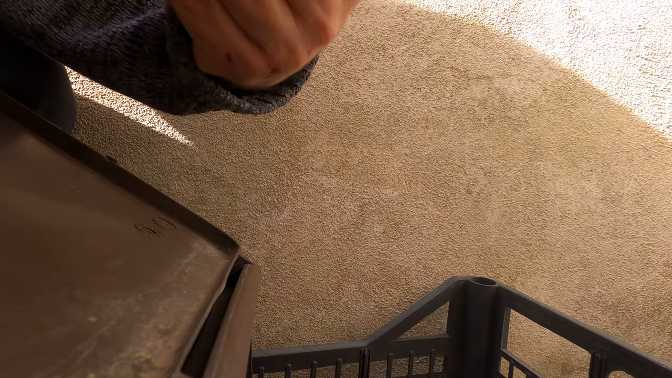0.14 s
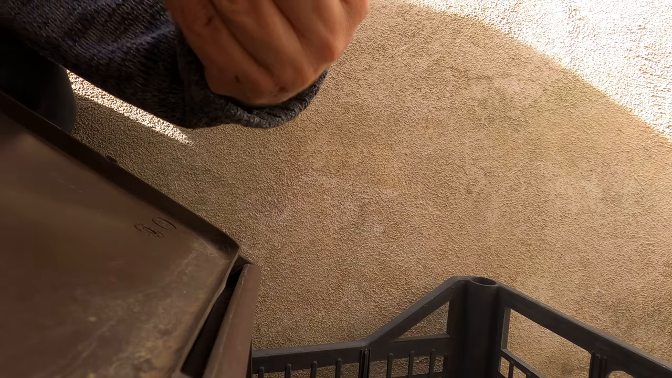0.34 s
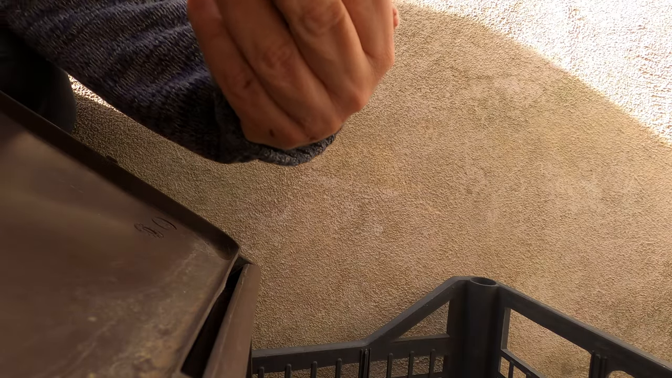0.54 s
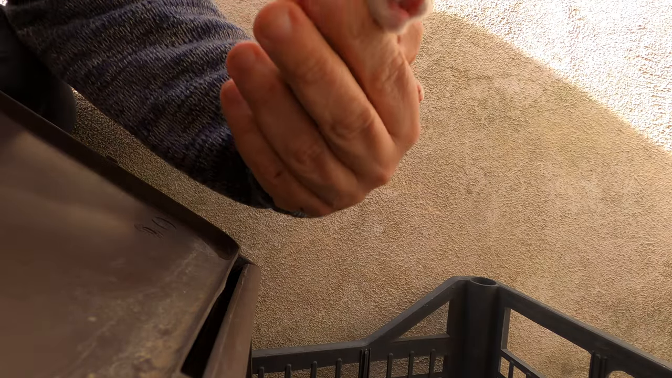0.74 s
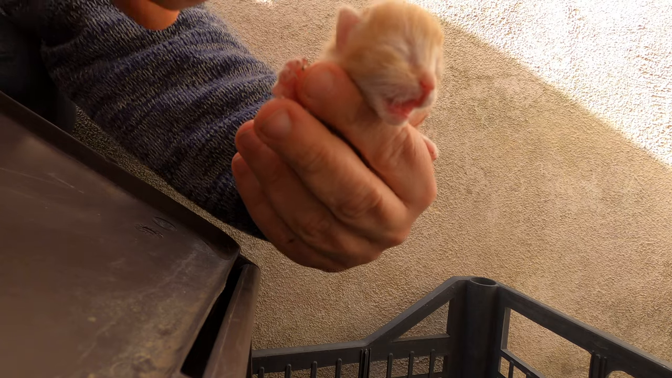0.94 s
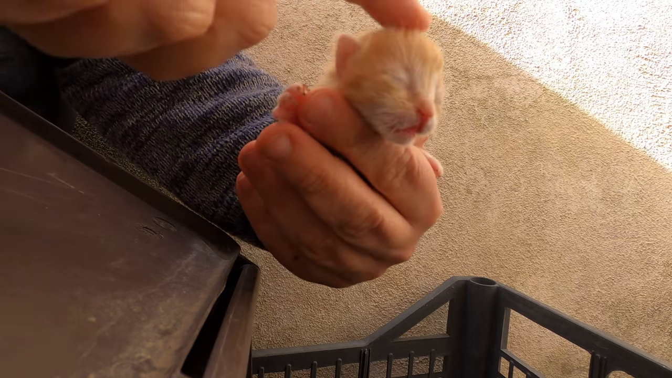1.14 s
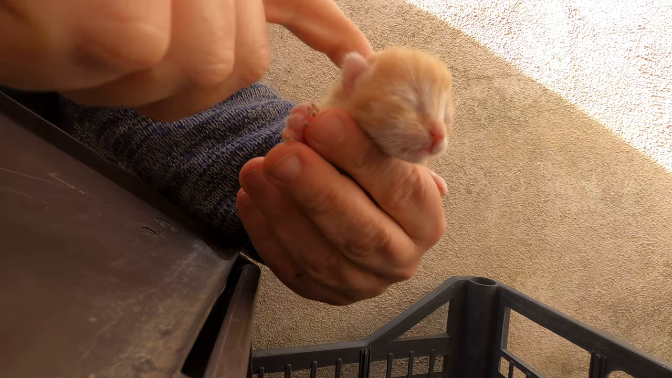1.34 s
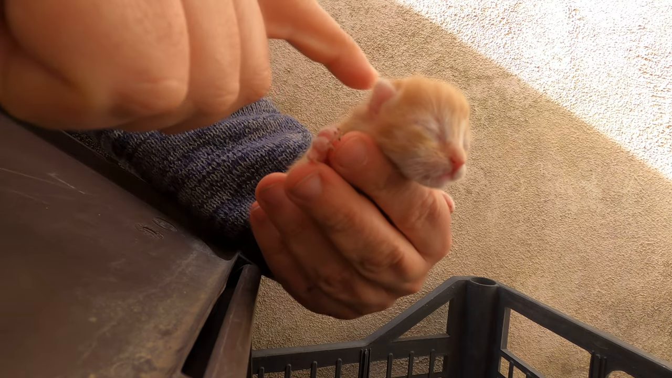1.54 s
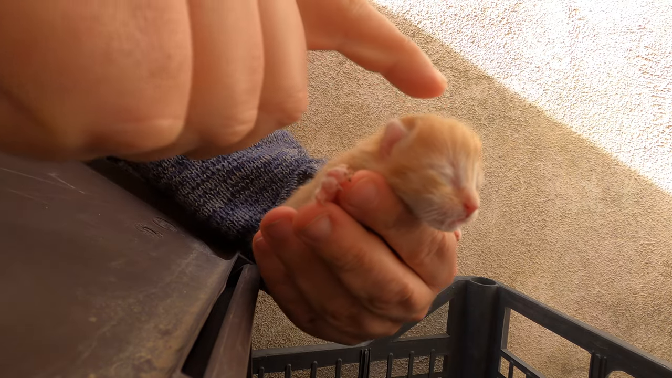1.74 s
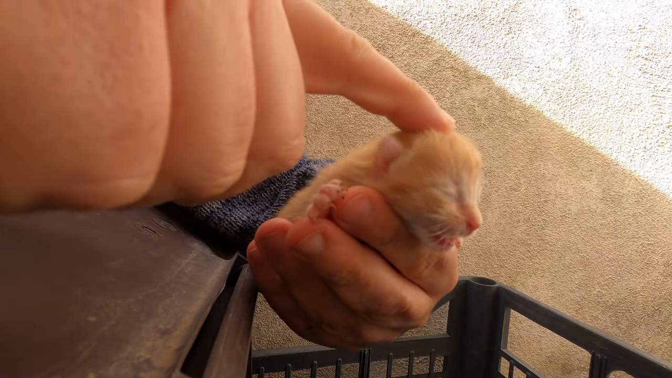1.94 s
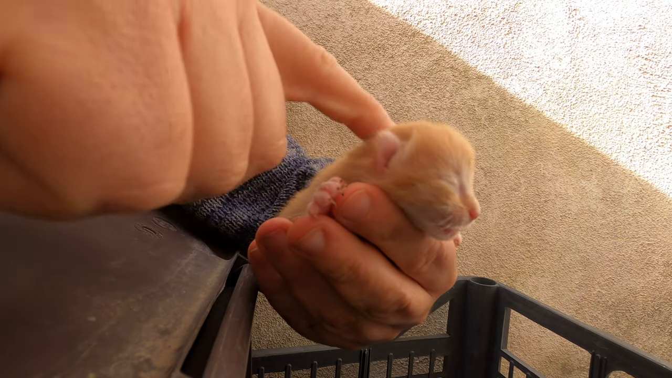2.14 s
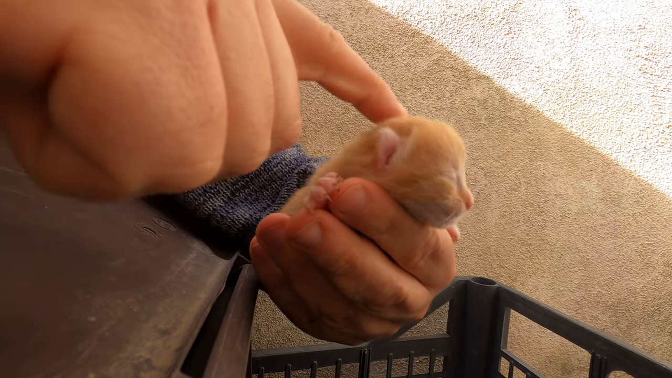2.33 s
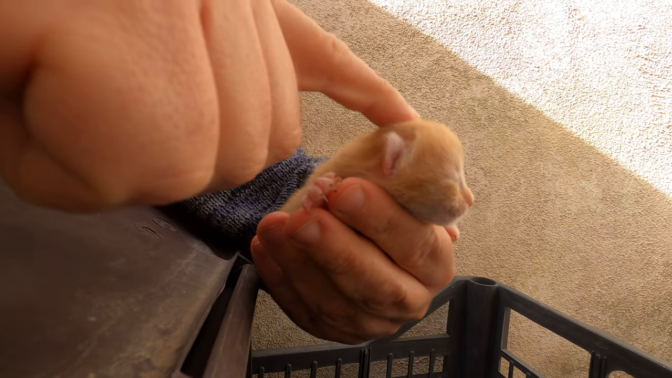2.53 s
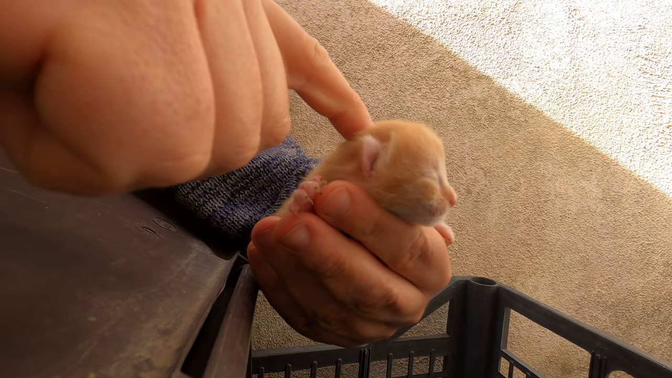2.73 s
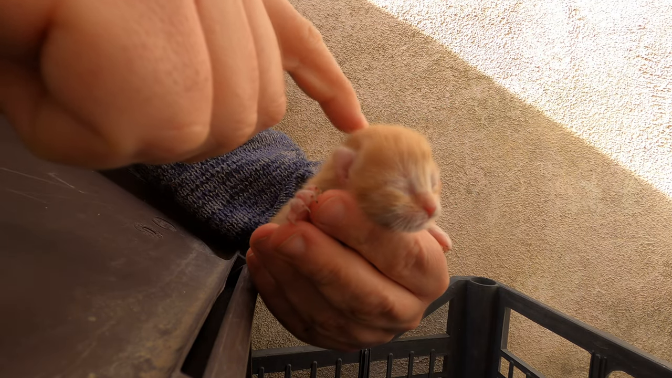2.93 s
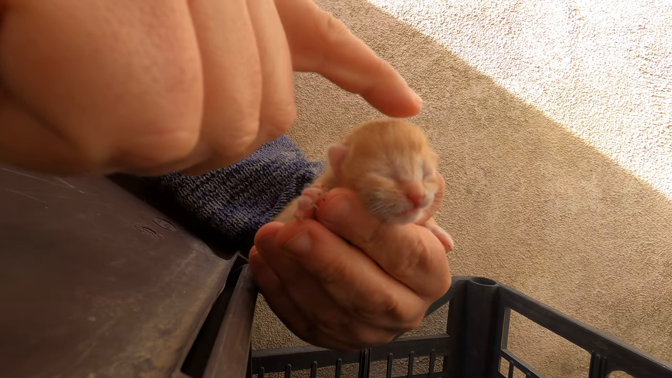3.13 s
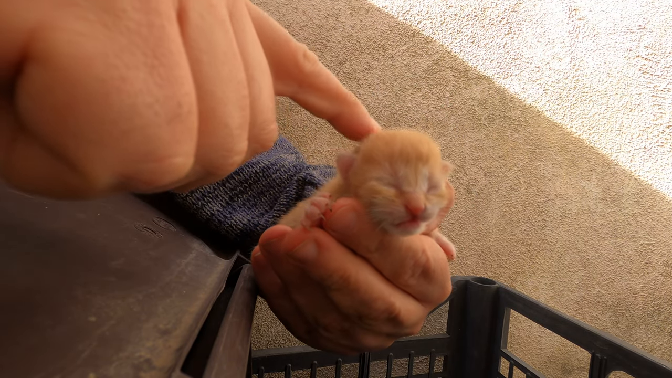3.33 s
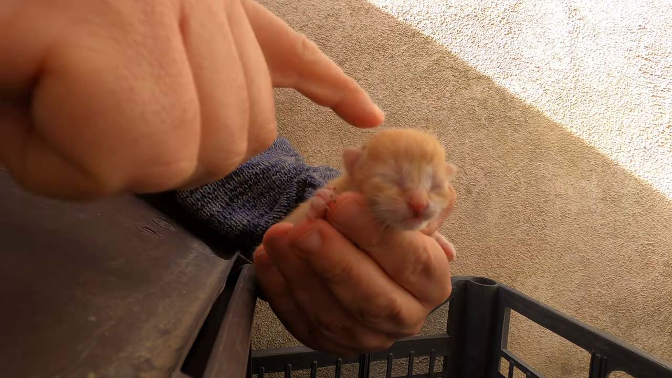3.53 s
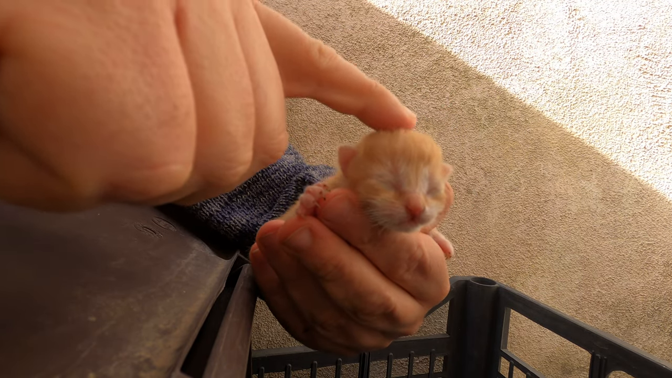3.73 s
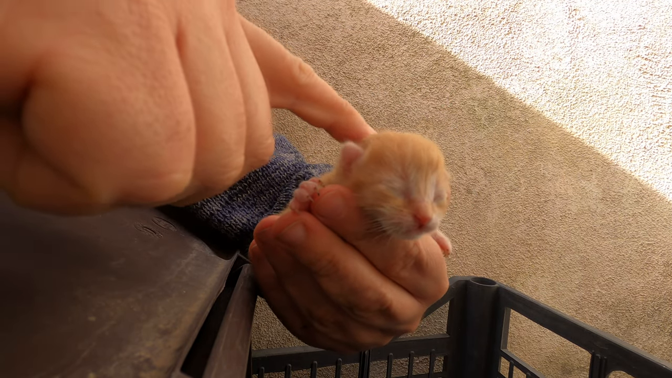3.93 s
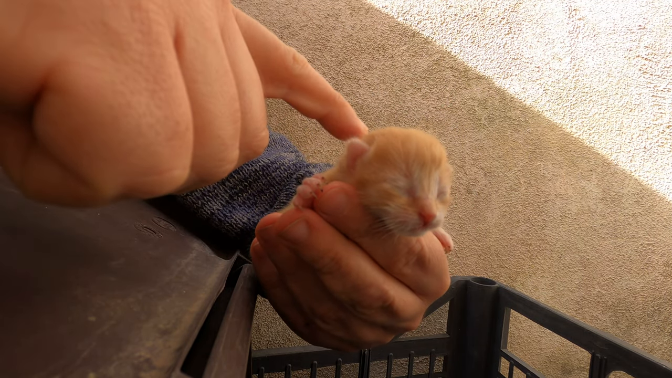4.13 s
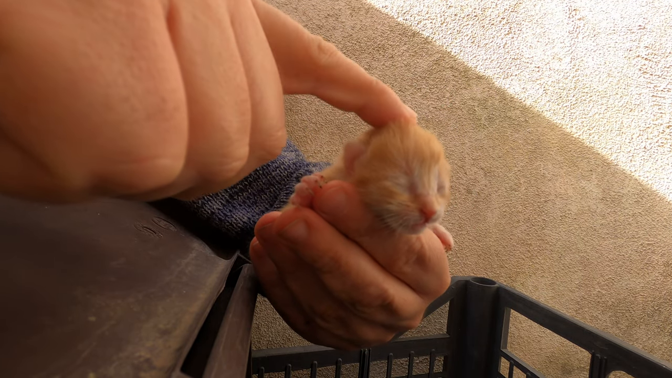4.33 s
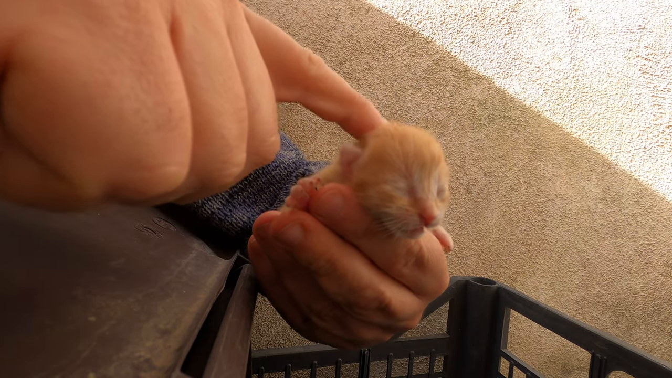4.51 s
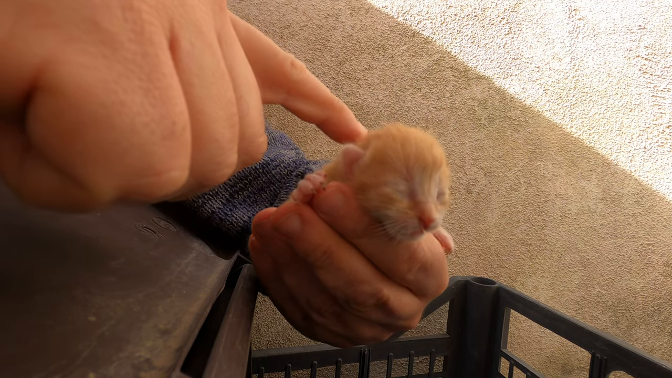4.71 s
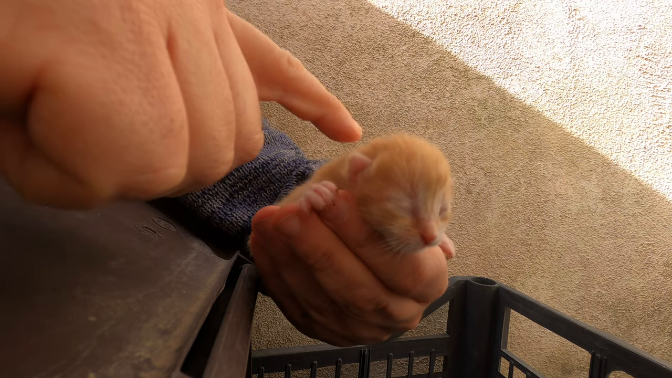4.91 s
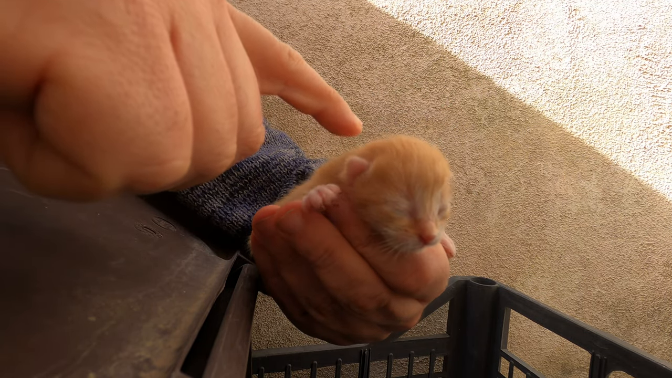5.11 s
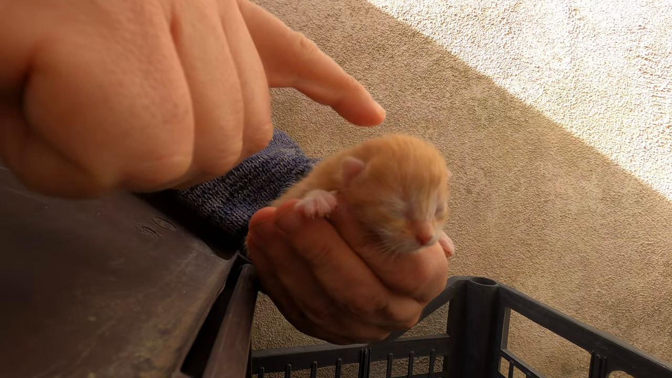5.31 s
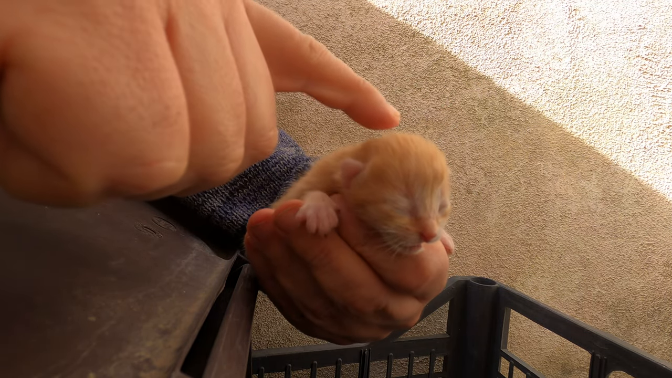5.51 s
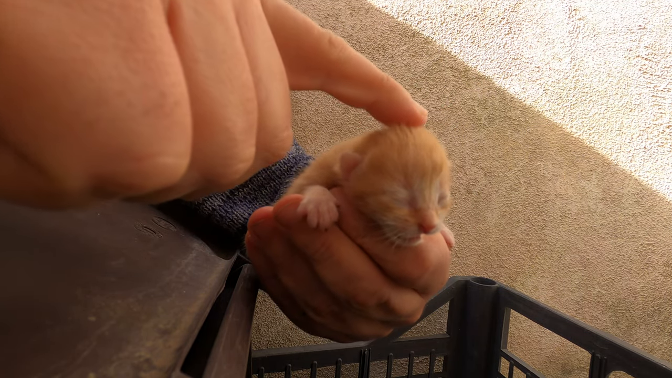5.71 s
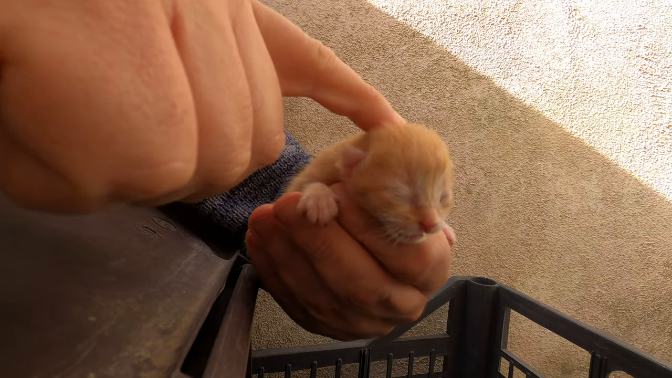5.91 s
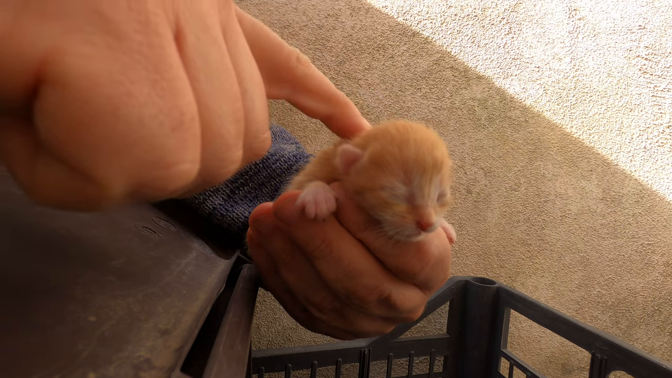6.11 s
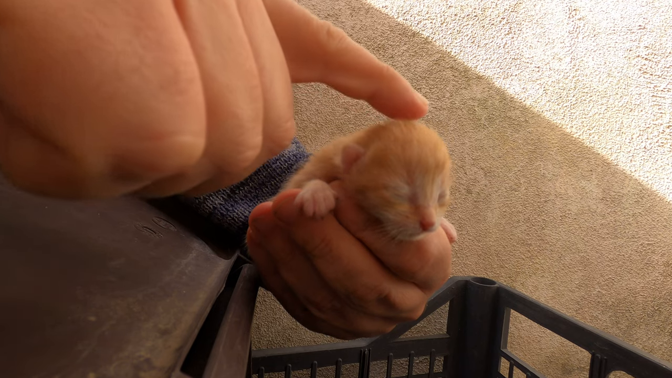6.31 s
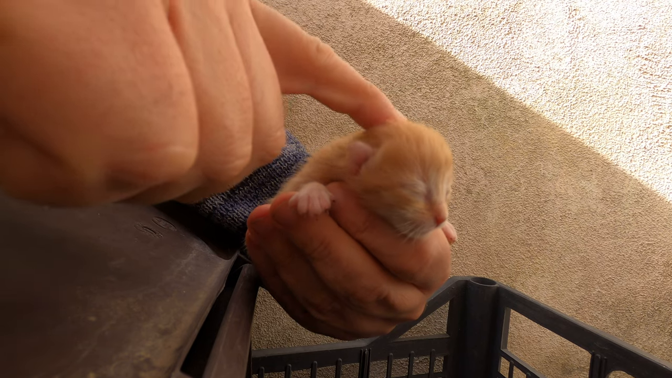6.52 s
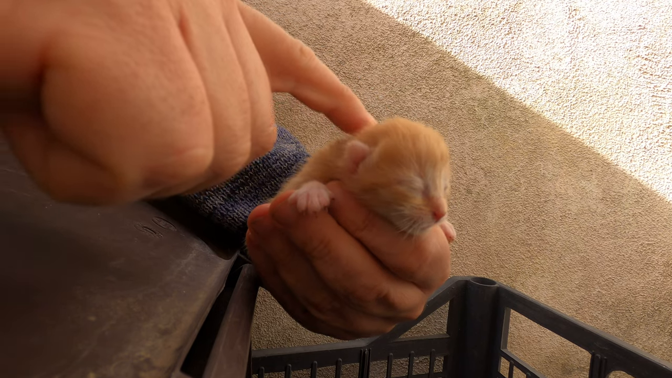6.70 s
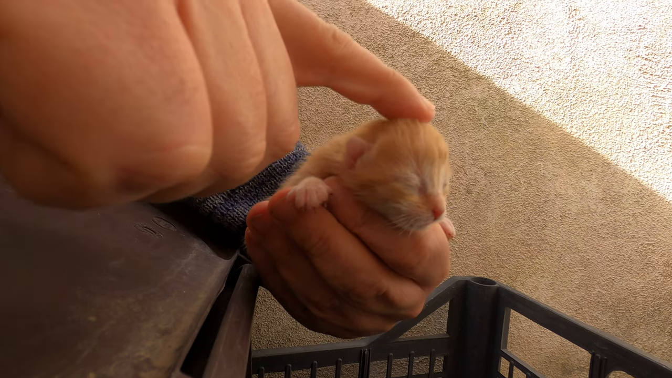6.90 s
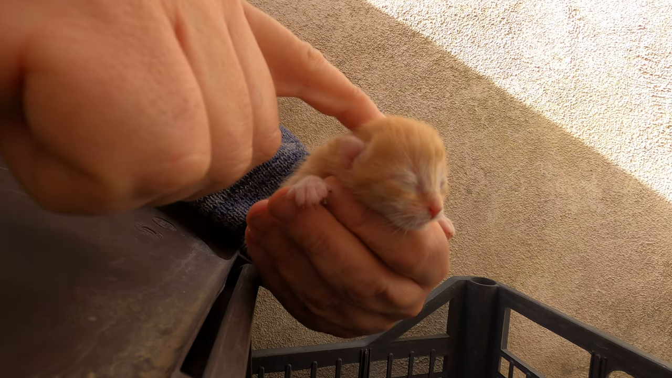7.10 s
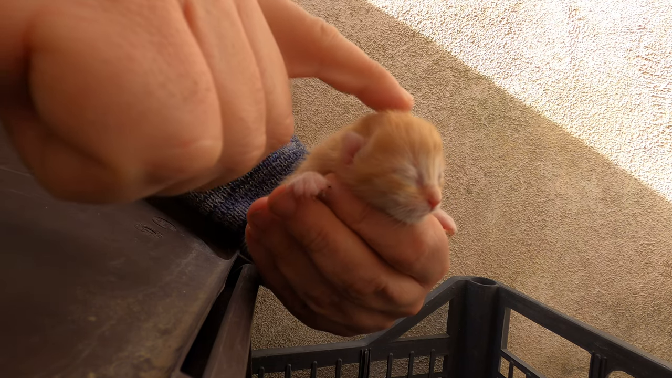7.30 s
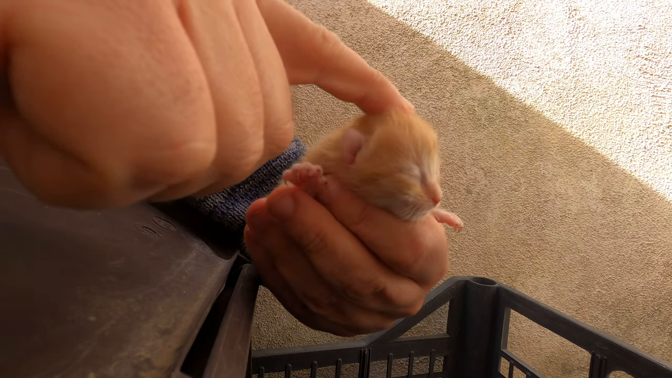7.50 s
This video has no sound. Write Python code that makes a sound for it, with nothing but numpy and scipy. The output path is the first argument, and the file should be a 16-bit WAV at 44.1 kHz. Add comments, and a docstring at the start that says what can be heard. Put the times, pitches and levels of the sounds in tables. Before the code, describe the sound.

Close stereo pickup in a small open yard with short, dull reflections. Thin, arching kitten mews follow one another, starting with a quiet muffled one, then a loud shrill one overlapped by a second kitten, then alternating cries with raspy tails. Later only the near kitten squeaks, in shorter broken cries, with a sharp click among them. Underneath, an engine idle disappears early and far traffic rumbles and hisses quietly. Last comes a low, soft kitten groan.

```python
"""Yard by a street: two newborn kittens cry, one held in a hand near the microphone, one lower in a crate.
Each cry is a stack of partials on a pitch arch; pulse creaks flank the held cries, breathy rasps the crate's.
Hoarse treble roughens two crate cries and a soft low groan comes last; small noise-burst clicks fall between.
Below lie an idling engine (one sine) that fades away and far traffic (rumble, drone, tyre hiss from noise)."""
import sys
import numpy as np
from scipy import signal
from scipy.fft import rfft, irfft
from scipy.io import wavfile
from scipy.ndimage import uniform_filter1d

SR = 44100
rng = np.random.default_rng(int(sys.argv[2]) if len(sys.argv) > 2 else 0)


def master(y):
    """Save y as 16-bit WAV."""
    cut = np.clip(np.atleast_2d(y).T, -1, 1)
    pcm = np.round(cut * 32767)  # scale
    wavfile.write(sys.argv[1], SR, pcm.astype(np.int16))


N = 332955

# Pitch of the crate kitten, one table a cry. Each row: time in seconds, pitch in Hz.
CRATE_PITCH = [
    [(0.3, 517.6), (0.364, 682), (0.424, 830), (0.476, 912), (0.524, 872), (0.572, 960), (0.672, 832),
     (0.74, 800), (0.788, 598)],
    [(1.21, 667), (1.266, 958), (1.314, 1052), (1.482, 1091), (1.51, 1028), (1.55, 922), (1.575, 829),
     (1.62, 775), (1.65, 691), (1.718, 501)],
    [(2.31, 602), (2.362, 926), (2.41, 1186), (2.474, 1295), (2.538, 1293), (2.6, 1195), (2.646, 1111),
     (2.715, 825), (2.8, 665), (2.845, 500)],
    [(3.775, 849), (3.823, 1153), (3.875, 1257), (3.947, 1265), (4.007, 1192), (4.105, 927), (4.189, 580),
     (4.22, 520)],
]


def amp(db):
    """dB to gain."""
    return 10 ** (np.asarray(db) / 20)


def rms_one(x):
    """Scale to rms 1."""
    return x / np.sqrt(np.mean(x ** 2) + 1e-20)


def in_time(rows, t):
    """Columns of a curve table at the times t."""
    s, *columns = np.transpose(rows)
    return [np.interp(t, s, c) for c in columns]


def at_hz(points, hz):
    """A spectrum table read on a log-frequency axis."""
    table_hz, value = np.transpose(points)
    return np.interp(np.log(hz), np.log(table_hz), value)


def drift(count, rate_hz):
    """Slow random wander of rms 1: noise through two equal one-pole low-passes."""
    r = np.exp(-2 * np.pi * rate_hz / SR)
    settle = SR // 2
    noise = rng.standard_normal(count + settle)
    return rms_one(signal.lfilter([1], [1, -2 * r, r * r], noise)[settle:])


def resonate(x, hz, width_hz):
    """A two-pole resonance with gain 1 on top."""
    r = np.exp(-np.pi * width_hz / SR)
    zeros = [(1 - r * r) / 2, 0, (r * r - 1) / 2]
    return signal.lfilter(zeros, [1, -2 * r * np.cos(2 * np.pi * hz / SR), r * r], x)


def stereo_noise(spectrum):
    """Coloured noise whose two sides grow unlike toward the treble; rms 1."""
    # Each row: frequency in Hz, left-right likeness 0-1.
    likeness = [(50, .975), (130, .96), (290, .82), (1400, .65), (3000, .5), (6500, .05)]
    hz = np.maximum(np.arange(N // 2 + 1) * SR / N, 1)
    colour = amp(at_hz(spectrum, hz)) * (hz > spectrum[0][0])
    mid, side = rfft(rng.standard_normal((2, N))) * colour
    alike = np.clip(at_hz(likeness, hz), 0, 1)
    return rms_one(irfft(np.sqrt(1 + alike) * mid + np.sqrt(1 - alike) * side * [[1], [-1]], N))


def pulses(rate_hz, uneven):
    """One click each cycle, uneven in spacing and strength."""
    step_hz = rate_hz * np.clip(1 + uneven * drift(len(rate_hz), 150), .2, 3)
    cycles = np.cumsum(step_hz) / SR
    ticks = np.diff(np.floor(cycles + .99), prepend=0)
    return ticks * amp(10 * uneven * rng.standard_normal(len(rate_hz)))


def throat(x, modes):
    """Parallel resonances of alternating sign, each applied twice so that the valleys stay dark."""
    out = 0
    for k, (hz, width_hz, db) in enumerate(modes):
        out = out + (-1) ** k * amp(db) * resonate(resonate(x, hz, width_hz), hz, width_hz)
    return out


def low_partials(hz, opening, db, voice):
    """Levels of the three lowest partials: effort follows pitch, the mouth resonance picks among them."""
    narrow_hz, wide_hz, mouth_q, steepness = 1123, 4040, 1.367, 1.55
    mouth_hz = narrow_hz * (wide_hz / narrow_hz) ** np.clip(opening, 0, 1)
    out = []
    for k, (source_db, slope_db) in enumerate(voice):
        x = (k + 1) * hz / mouth_hz
        mouth_db = -10 * steepness * np.log10((1 - x * x) ** 2 + (x / mouth_q) ** 2)
        out.append(db + source_db + slope_db * np.log2(hz / hz.max()) + mouth_db)
    return out


def kitten(cries, voice, colour, side, shut_mouth, attack_s, ragged):
    """Each cry is a stack of partials; the voice grows ragged and the mouth shuts as the pitch sinks."""
    open_pitch_hz, release_s = 1080, 0.0034
    ring_hz, ring_width_hz = 12700, 1900  # heard near peak effort while the mouth is open
    shut_hz, shut_width_hz, late_share = shut_mouth
    out = np.zeros((2, N))
    for pitch, mouth, (fall_db, ring_db, shut_db, third_db, top_hz) in cries:
        at = np.arange(int(pitch[0][0] * SR), int(pitch[-1][0] * SR))
        count, since_s = len(at), (at - at[0]) / SR
        hz = uniform_filter1d(in_time(pitch, at / SR)[0], size=900, mode="nearest")  # folds cannot turn corners
        shut = np.clip(1 - hz / open_pitch_hz, 0, 1)
        jitter = (.002 + ragged * shut) * drift(count, 80)
        wobble = (.003 + .6 * ragged * shut) * drift(count, 20)
        hz = hz * (1 + jitter + wobble)
        phase = 2 * np.pi * np.cumsum(hz) / SR
        opening, effort_db = in_time(mouth, at / SR)
        low_db = low_partials(hz, opening, effort_db, voice)
        strain = np.clip(0.5 + (effort_db - effort_db.max()) / 16, 0, 1)
        ring_gate = strain * np.clip(1 - 5 * shut, 0, 1)
        lift_gate = shut * np.maximum(np.exp(-(since_s / 0.24) ** 2), late_share)  # fades as the cry goes on
        edge = np.clip(np.minimum(since_s / attack_s, (at[-1] - at) / SR / release_s), 0, 1)
        for k in range(1, 17):
            k_hz = k * hz
            if k < 4:
                level_db = low_db[k - 1] + third_db * (k == 3)
            else:
                # upper partials follow the second and third, coloured by the mouth
                level_db = (low_db[1] + low_db[2]) / 2 - 8.0 + fall_db * np.log2(k / 3) + at_hz(colour, k_hz)
                level_db += ring_db * ring_gate * np.exp(-((k_hz - ring_hz) / ring_width_hz) ** 2)
                level_db += shut_db * lift_gate * np.exp(-((k_hz - shut_hz) / shut_width_hz) ** 2)
                level_db -= 68.5 * shut * np.log2(np.maximum(k_hz / 4070, 1))  # a shut mouth is dull
                level_db -= 80 * np.log2(np.maximum(k_hz / top_hz, 1))  # muffled
            # upper partials are less steady; a ragged voice comes in patches
            shimmer_db = (.9 + 18 * ragged) * np.sqrt(k) * drift(count, 5 + 1800 * ragged)
            patches_db = ragged * (25 + 170 * shut) * drift(count, 14)
            gain = np.sqrt(2) * edge * amp(level_db + shimmer_db + patches_db)
            wave = gain * np.cos(k * phase - k * k / 6) * (k_hz < SR / 2.2)
            out[:, at] += wave * amp(at_hz(side, k_hz) / 2 * [[1], [-1]])
    return out


def street():
    """An engine note that fades, a deep resonant rumble, a drone and tyre hiss from coloured noise."""
    # Each row: time in seconds, firing rate in Hz, level in dB ahead of the fade gain.
    engine_rows = [(0.0, 43.19, -24), (1.002, 44.6, -25.5), (1.6, 41.5, -67)]
    # Each row: time in seconds, deep rumble in dB, drone in dB, tyre hiss in dB.
    traffic_rows = [(0, -32.5, -40.5, -42), (.9, -33, -40, -48), (1.9, -43, -45.5, -49.5),
                    (2.7, -37, -47, -53.5), (3.5, -33, -49, -57), (4.7, -42.5, -45, -56),
                    (5.2, -43, -51.5, -60), (5.8, -40.5, -45.5, -57.5), (7.0, -33, -47.5, -59),
                    (7.55, -35, -48, -60.5)]
    # Spectra of drone and hiss. Each row: frequency in Hz, density in dB per Hz.
    drone_colour = [(32, -22), (76, -14.5), (106, -4.5), (150, -15.5), (320, -34.5), (420, -70)]
    hiss_colour = [(150, -16.5), (355, -7.5), (470, -5), (680, -12.5), (1090, -6.5), (2520, -15.5),
                   (4760, -20.5), (7500, -35.5), (9500, -85.5)]
    t = np.arange(N) / SR
    firing_hz, engine_db = in_time(engine_rows, t)
    fade = np.clip(engine_rows[-1][0] - t, 0, .2) / 0.19  # 1.05 until the last 0.2 s
    engine = np.sqrt(2) * amp(engine_db) * np.sin(2 * np.pi * np.cumsum(firing_hz) / SR) * fade
    rumble_db, drone_db, hiss_db = in_time(traffic_rows, t)
    deep = resonate(stereo_noise([(20, -4.0), (200, -12.0), (500, -69)]), hz=43.94, width_hz=5.1)
    rumble = amp(rumble_db) * rms_one(deep)
    drone = amp(drone_db + 1.9 * drift(N, 4.7)) * stereo_noise(drone_colour)
    hiss = amp(hiss_db + drift(N, 22.0) + drift(N, 3.6)) * stereo_noise(hiss_colour)
    return engine + rumble + drone + hiss


def clicks():
    """Short bursts of band-passed noise that start at once and die exponentially."""
    # Each row: start in seconds, peak in dB, t60 in seconds, low edge in Hz, high edge in Hz.
    click_rows = [(0.072, -30, 0.024, 330, 786), (0.195, -26.5, 0.029, 1000, 4400),
                  (.822, -42, .015, 4500, 7500), (0.843, -35.5, 0.02, 4000, 9000),
                  (1.362, -42, 0.02, 1500, 8000), (3.275, -44, 0.02, 3030, 7000),
                  (3.286, -41, 0.03, 4000, 7650), (3.363, -43, .015, 5000, 12000),
                  (5.173, -44, 0.014, 2440, 8200), (5.822, -26, .07, 400, 10000),
                  (5.824, -37.5, 0.054, 348, 510), (5.889, -32, 0.015, 991, 9000)]
    out, t = np.zeros((2, N)), np.arange(SR // 8) / SR
    for s, db, t60_s, low_hz, high_hz in click_rows:
        noise = rng.standard_normal(len(t)) + 0.18 * rng.standard_normal((2, len(t)))
        band = signal.butter(2, [low_hz, high_hz], "band", fs=SR, output="sos")
        burst = signal.sosfilt(band, noise * amp(-60 * t / t60_s))
        a = int(s * SR)
        out[:, a:a + len(t)] += amp(db) * burst / np.abs(burst).max()
    return out


def crate_kitten():
    """In the crate the effort setting holds steady while the mouth slowly closes."""
    # Each row, one a cry: effort in dB, opening 0-1 at the start, at the end, fall of the upper partials
    # in dB per octave, shut-mouth lift in dB, third partial in dB, muffled above in Hz.
    cry_rows = [(-46.5, 0.81, 0.2, -1.5, 24, 2.5, 2950), (-39.5, 0.53, 0.43, -13.5, 17, 1, 4150),
                (-36, 1, 0.47, -15, 34.5, 3.5, SR), (-40.5, 0.95, 0.54, -15, 18, 1, SR)]
    # Three lowest partials. Each row: source strength in dB, growth with pitch in dB per octave.
    voice = [(-8.5, 6.6), (-2.5, 12), (-2, 15.8)]
    # Mouth colour on the upper partials. Each row: frequency in Hz, level in dB.
    colour = [(1500, 11.5), (3800, -2.5), (5200, 5), (7800, -2.5), (8800, -28), (15000, -25)]
    # Each row: frequency in Hz, left minus right in dB.
    side = [(700, 1), (2300, -0.5), (6000, 2), (13000, -27.5)]
    cries = []
    for pitch, (effort_db, first, last, fall_db, *rest) in zip(CRATE_PITCH, cry_rows):
        mouth = [(pitch[0][0], first, effort_db), (pitch[-1][0], last, effort_db)]
        cries.append((pitch, mouth, (fall_db, 0, *rest)))  # no high ring
    shut_mouth = (3230, 590, 0.51)  # Hz, width Hz, share of the lift left late in the cry
    return kitten(cries, voice, colour, side, shut_mouth, attack_s=0.045, ragged=.04)


def creaks():
    """Slow folds around held cries: single pulses that run into the voice, more ragged when closing."""
    # Each row: seconds where the pulses are slowest, seconds where they join the cry,
    # slowest rate in Hz, level in dB.
    creak_rows = [(.803, .822, 500, -42), (1.41, 1.35, 350, -47), (1.896, 1.92, 300, -44),
                  (2.565, 2.535, 400, -46), (3.143, 3.18, 400, -43), (3.79, 3.73, 550, -45),
                  (4.361, 4.42, 160, -40), (5.478, 5.485, 450, -47), (6.265, 6.22, 300, -49),
                  (6.624, 6.63, 450, -47), (6.79, 6.755, 350, -48)]
    # Each row: resonance in Hz, width in Hz, level in dB.
    creak_modes = [(1550, 850, 3), (3750, 950, 2)]
    join_hz = 560
    out, tail = np.zeros(N), SR // 100
    for slow_s, join_s, slow_hz, db in creak_rows:
        a, b = sorted([int(slow_s * SR), int(join_s * SR)])
        slowing_hz = np.geomspace(join_hz, slow_hz, b - a)
        if slow_s < join_s:
            source = pulses(slowing_hz, .06)[::-1] * np.linspace(.5, 1, b - a)
            dull_hz = 4800
        else:
            source = pulses(slowing_hz, .25) * np.hanning(b - a)
            dull_hz = 3000  # a closing mouth is duller
        dull = signal.butter(4, dull_hz, fs=SR, output="sos")
        ring = signal.sosfilt(dull, throat(np.pad(source, (0, tail)), creak_modes))
        out[a:b + tail] += amp(db) * ring / np.sqrt(np.mean(ring[:b - a] ** 2))
    return out


def held_kitten():
    """In the hand, mouth opening and effort move within each cry and steer its partials."""
    # One table a cry. Each row: time in seconds, pitch in Hz.
    pitches = [
        [(0.822, 771), (0.891, 1016), (0.923, 1146), (0.971, 1284), (1.011, 1307), (1.047, 1239), (1.083, 1254),
         (1.183, 1092), (1.239, 1079), (1.299, 879), (1.355, 653), (1.367, 781), (1.395, 553)],
        [(1.92, 586), (1.996, 827), (2.068, 977.5), (2.228, 1026), (2.34, 996), (2.436, 884), (2.532, 675),
         (2.548, 576)],
        [(3.18, 635), (3.218, 760), (3.25, 894), (3.314, 1088), (3.498, 1204), (3.57, 1127), (3.634, 1080),
         (3.715, 913), (3.77, 624)],
        [(4.42, 578), (4.446, 780), (4.5, 1057), (4.53, 1176), (4.554, 1097), (4.658, 1145), (4.75, 1128),
         (4.898, 865), (4.938, 685)],
        [(5.485, 570), (5.557, 818), (5.633, 1043), (5.685, 1012), (5.821, 1089), (5.885, 1021)],
        [(5.887, 1153), (5.919, 1046), (5.951, 1009), (6.063, 1046), (6.131, 826), (6.195, 922), (6.239, 731)],
        [(6.63, 567), (6.67, 694), (6.698, 756), (6.718, 745), (6.77, 684)],
    ]
    # One table a cry. Each row: time in seconds, opening 0-1, effort in dB.
    mouths = [
        [(.815, 0.23, -39), (.923, 0.91, -35.5), (1.035, 0.53, -27.5), (1.131, 0.68, -26), (1.25, 0.37, -27.5),
         (1.343, 0.11, -34), (1.395, 0.68, -31.5)],
        [(1.92, 0.44, -39), (2.152, 0.73, -33.5), (2.216, 0.3, -32.5), (2.548, 0.52, -34.5)],
        [(3.158, 0.3, -40.5), (3.306, 0.48, -34.5), (3.506, 0.42, -31), (3.7, 0.33, -31.5), (3.77, 0.32, -31.5)],
        [(4.41, 0.49, -37), (4.574, 0.5, -33.5), (4.758, 0.29, -32), (4.938, 0.33, -34)],
        [(5.485, 0.56, -41.5), (5.645, 0.42, -34.5), (5.885, 0.12, -33)],
        [(5.887, 0.38, -31), (5.987, 0.04, -32), (6.06, 0.2, -30.5), (6.13, 0.08, -38.5), (6.211, 0.43, -31.5),
         (6.239, 0.38, -32)],
        [(6.63, 0.32, -45.5), (6.738, 0.49, -41.5), (6.77, 0.36, -42)],
    ]
    # Each row, one a cry: fall of the upper partials in dB per octave, high ring in dB,
    # shut-mouth lift in dB, third partial in dB.
    cry_rows = [(-7.5, 50, 69, 0.5), (-13, 5, 68, -3.3), (-17, -14, 78, 1), (-15.5, -13, 61, 0),
                (-9, -9, 52.5, -2.5), (-10.5, 3, 29, 0), (-2, -5, 32, 0)]
    # Three lowest partials. Each row: source strength in dB, growth with pitch in dB per octave.
    voice = [(-3.5, 8.4), (0, 7.5), (0.5, 12.5)]
    # Mouth colour on the upper partials. Each row: frequency in Hz, level in dB.
    colour = [(1500, 2), (3800, -6), (5000, -10), (5900, -15.5), (7200, -8.5), (8300, -15), (10000, -34.5),
              (15000, -35.5)]
    # Each row: frequency in Hz, left minus right in dB.
    side = [(700, -4), (2300, -4), (4250, 2.5), (7800, 0), (13000, -14)]
    cries = zip(pitches, mouths, [(*row, SR) for row in cry_rows])  # SR: not muffled
    shut_mouth = (3950, 1280, 0.079)  # Hz, width Hz, share of the lift left late in the cry
    return kitten(cries, voice, colour, side, shut_mouth, attack_s=0.002, ragged=.012)


def rasps():
    """The crate kitten's rasps: uneven pulses with breath, through two throat resonances."""
    # Each row: start in seconds, end in seconds, pulse rate in Hz at the start, at the end,
    # level in dB ahead of the swell.
    rasp_rows = [(1.66, 1.75, 600, 250, -55), (2.28, 2.36, 350, 740, -50), (2.76, 2.9, 700, 300, -52),
                 (4.13, 4.28, 700, 250, -53)]
    # Each row: resonance in Hz, width in Hz, level in dB.
    rasp_modes = [(1400, 900, 0), (2400, 1000, -3)]
    out = np.zeros(N)
    for start_s, end_s, first_hz, last_hz, db in rasp_rows:
        a, b = int(start_s * SR), int(end_s * SR)
        breath = .5 * rng.standard_normal(b - a)
        source = rms_one(pulses(np.linspace(first_hz, last_hz, b - a), .15)) + breath
        swell = 2 * np.hanning(b - a)
        out[a:b] += amp(db) * rms_one(throat(source, rasp_modes)) * swell
    return out


def hoarse():
    """Pulses at the crate pitch, with breath, hiss in two high throat resonances."""
    # Each row: start in seconds, length in seconds, level in dB ahead of the swell.
    hoarse_rows = [(2.37, 0.15, -64), (2.584, 0.29, -64.5), (3.811, 0.089, -61.5), (3.98, 0.23, -67)]
    # Each row: resonance in Hz, width in Hz, level in dB.
    hoarse_modes = [(8200, 1900, 6), (12500, 2700, -4)]
    out, pitch = np.zeros(N), sum(CRATE_PITCH, [])
    for s, length_s, db in hoarse_rows:
        at = np.arange(int(s * SR), int((s + length_s) * SR))
        breath = .6 * rng.standard_normal(len(at))
        source = rms_one(pulses(in_time(pitch, at / SR)[0], .005)) + breath
        level = amp(db + 2.0 * drift(len(at), 25)) * np.sqrt(np.hanning(len(at)))
        out[at] += level * rms_one(throat(source, hoarse_modes))
    return out


def groan():
    """A long soft creak with breath in it: pulse rate and level rise, then sag."""
    # One row: start in seconds, swell in seconds, sag in seconds, slow rate in Hz, fast rate in Hz,
    # level in dB ahead of the swell, swell depth in dB.
    groan_row = (7.12, .2, .3, 180, 265, -54, 10)
    # Each row: resonance in Hz, width in Hz, level in dB.
    groan_modes = [(970, 620, -3), (1635, 230, 3.5), (2070, 480, 0), (2710, 520, -6)]
    s, swell_s, sag_s, slow_hz, fast_hz, db, swell_db = groan_row
    at = np.arange(int(s * SR), N)
    from_top_s = at / SR - s - swell_s
    below = (from_top_s / np.where(from_top_s < 0, swell_s, sag_s)) ** 2  # 0 at the top of the swell
    breath = .25 * rng.standard_normal(len(at))
    source = rms_one(pulses(fast_hz - (fast_hz - slow_hz) * below, .04)) + breath
    out = np.zeros(N)
    out[at] = amp(db - swell_db * below) * rms_one(throat(source, groan_modes))
    return out


def yard(x):
    """A few short dull echoes from ground and walls, swapped between the sides."""
    # Each row: delay in seconds, level in dB.
    echo_rows = [(.0093, -17.5), (0.019, -20.5)]
    dull = signal.lfilter([.4], [1, -.6], x[::-1])
    out = x
    for s, db in echo_rows:
        out = out + amp(db) * np.pad(dull, ((0, 0), (int(s * SR), 0)))[:, :N]
    return out


def scene():
    """Kittens and clicks in the yard, over the street."""
    rough = creaks() * amp([[-.6], [.6]]) + rasps() + groan() + hoarse() * amp([[-1.5], [1.5]])
    return yard(held_kitten() + crate_kitten() + rough + clicks()) + street()


def record(dry):
    """The left port hears a little later; the top is cut."""
    left_lag_samples, cutoff_hz = 2, 15800
    wet = np.array([np.pad(dry[0], (left_lag_samples, 0))[:N], dry[1]])
    return signal.sosfilt(signal.cheby2(12, 70, cutoff_hz, fs=SR, output="sos"), wet)


dry = scene()
out = record(dry)
master(out)
```